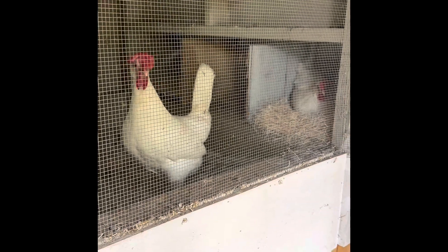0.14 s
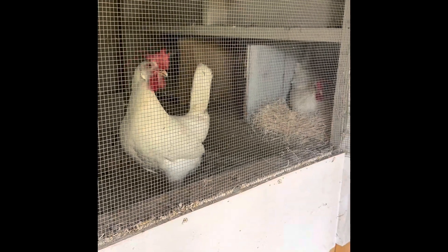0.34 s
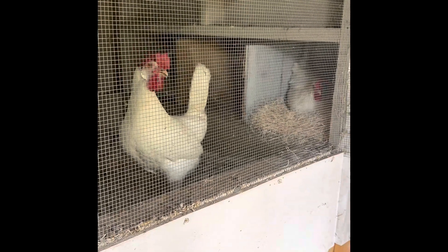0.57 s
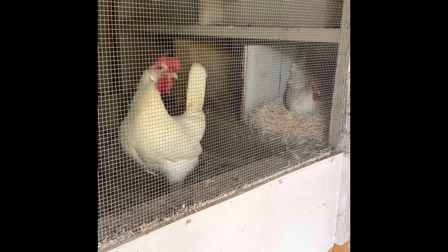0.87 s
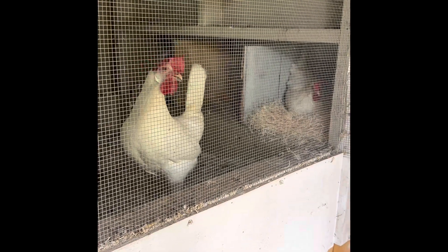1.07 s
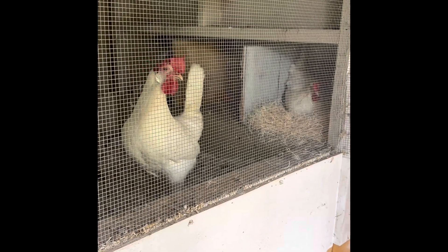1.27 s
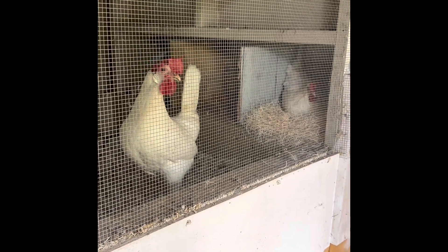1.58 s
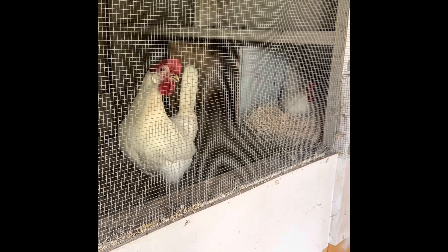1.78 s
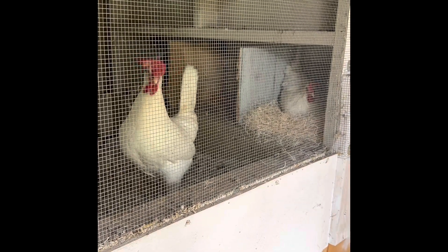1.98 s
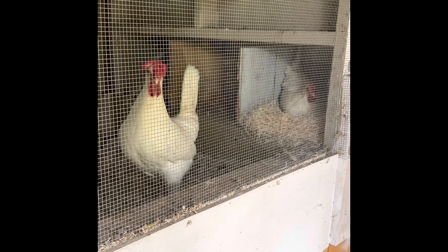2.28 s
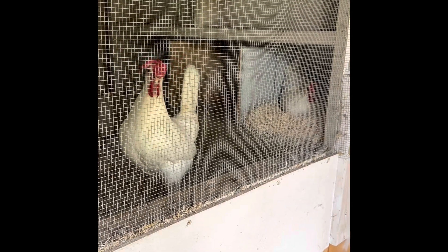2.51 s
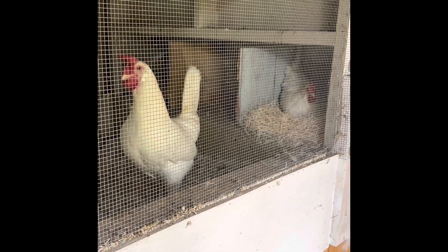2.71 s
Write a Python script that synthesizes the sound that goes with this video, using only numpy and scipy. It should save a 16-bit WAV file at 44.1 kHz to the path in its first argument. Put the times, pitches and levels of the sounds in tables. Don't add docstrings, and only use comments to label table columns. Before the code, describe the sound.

Quick steady hen clucks, close and slightly hoarse, with faint foot scuffs and soft outdoor hiss.

```python
import sys
import numpy as np
from scipy import signal
from scipy.fft import rfft, irfft, next_fast_len
from scipy.io import wavfile
from scipy.ndimage import map_coordinates

SR = 44100
rng = np.random.default_rng(int(sys.argv[2]) if len(sys.argv) > 2 else 0)


def master_out(mix):
    frames = np.transpose(np.atleast_2d(mix))
    ceiling = np.clip(frames, -1, 1)
    pcm = np.round(ceiling * 32767).astype(np.int16)
    wavfile.write(sys.argv[1], SR, pcm)


def invert_db(level):
    return 10 ** (np.asarray(level, dtype=float) / 20)


N = 125685


def unit(x):
    return x / np.sqrt(np.mean(x ** 2) + 1e-20)


def along(points, hz):
    f, v = np.transpose(points)
    return np.interp(np.log(hz + 1), np.log(f + 1), v)


def wobble(rate):
    knots = rng.standard_normal(int(N * rate / SR) + 4)
    return map_coordinates(knots, [np.arange(N) * rate / SR])


def filtered(x, response):
    m = 2 * next_fast_len(x.shape[-1] // 2 + 8192)
    spectrum = rfft(x, m) * response(np.fft.rfftfreq(m, 1 / SR))
    return irfft(spectrum, m)[..., :x.shape[-1]]


def causal(points):
    def response(hz):
        c = irfft(np.log(invert_db(along(points, hz))))
        c[1:len(c) // 2] *= 2
        c[len(c) // 2 + 1:] = 0
        return np.exp(rfft(c))
    return response


def rise(t, tau):
    return 1 - np.exp(-(np.maximum(t, 0) / max(tau, 1e-4)) ** 2)


def resonance(f, hz, width, db):
    return invert_db(db) * 1j * f * width / (hz * hz - f * f + 1j * f * width)


def stereo_noise(points):
    mono_hz = 330

    def mid_side(hz):
        spread = hz ** 2 / (hz ** 2 + mono_hz ** 2) + 0.049
        return invert_db(along(points, hz)) * np.array([np.ones_like(hz), spread])
    mid, side = filtered(rng.standard_normal((2, N)), mid_side)
    return unit(np.array([mid + side, mid - side]))


# frequency in Hz, level in dB per Hz.
RUMBLE = [(12, -47), (20, -13.5), (43, -5), (59, 6), (183, -9), (200, -5.5), (260, -16), (440, -120)]
# time in seconds, level in dB.
RUMBLE_SWELL = [(0.0, -59.5), (0.59, -71), (0.64, -60), (0.72, -76.5), (1.44, -74), (1.63, -62),
                (2.69, -66.5), (2.78, -68), (2.85, -51.5)]


def rumble():
    s, db = np.transpose(RUMBLE_SWELL)
    level_db = np.interp(np.arange(N) / SR, s, db) + 0.81 * wobble(8)
    return invert_db(level_db) * stereo_noise(RUMBLE)


# frequency in Hz, level in dB per Hz.
AIR = [(200, -16), (700, -12.5), (1200, -5), (1600, -25), (3200, -29), (5000, -37.5), (8000, -36.5),
       (12000, -95)]
AIR_DB, GUST_DB = -57.5, -0.5


def air():
    return invert_db(AIR_DB + GUST_DB * wobble(3.4)) * stereo_noise(AIR)


# frequency in Hz, level in dB.
APART = [(300, -7), (3000, -10.5), (8000, -5), (11000, -20.5)]


def tail(decays, delay_s, size):
    hz, t, z = signal.stft(rng.standard_normal((2, size)), SR, nperseg=256)
    decay = invert_db(-60 * t / along(decays, hz)[:, None])
    h = signal.istft(z * decay, SR, nperseg=256)[1]
    h = h * rise(np.arange(h.shape[1]) / SR - delay_s, 0.006)
    h = h / np.linalg.norm(h, axis=1, keepdims=True)
    opposed = filtered(h[1], lambda f: invert_db(along(APART, f)))
    return h[0] + np.array([opposed, -opposed])


# frequency in Hz, time to fall 60 dB in seconds.
YARD = [(300, 0.41), (1200, 0.63), (1700, 0.13), (3300, 0.61), (7000, 0.55)]
# frequency in Hz, time to fall 60 dB in seconds.
FAR_WALL = [(300, 0.2), (1200, 0.4), (3500, 0.12), (7000, 0.07)]
YARD_DB, FAR_WALL_S, FAR_WALL_DB = -31, .19, -43.5


def yard(x):
    h = invert_db(YARD_DB) * tail(YARD, 0.049, size=SR * 3 // 4)
    echo = invert_db(FAR_WALL_DB) * tail(FAR_WALL, 0, size=SR // 4)[:, :SR // 4]
    start = round(FAR_WALL_S * SR)
    h[:, start:start + SR // 4] += echo
    return signal.fftconvolve(x[None], h, axes=1)[:, :N]


# frequency in Hz, time to fall 60 dB in seconds.
COOP = [(200, 0.19), (530, 0.19), (1300, 0.18), (3700, 0.16), (9700, 0.21), (15000, 0.15)]
# delay in seconds, level in dB.
WALLS = [(.0021, -10.5), (.0034, -10.5), (.0052, -14.5), (.0077, -2), (.011, -13)]
COOP_DB, WALL_SHIFT = -3.5, .12


def coop(x):
    out = np.zeros((2, N))
    delays, walls_db = np.transpose(WALLS)
    edges = [0] + [round((row[0] - .02) * SR) for row in CLUCKS[1:]] + [N]
    for a, b in zip(edges, edges[1:]):
        h = invert_db(COOP_DB) * tail(COOP, 0.0037, size=SR // 4)
        moved = delays * (1 + WALL_SHIFT * rng.uniform(-1, 1, len(delays)))
        h[:, (SR * moved).astype(int)] += invert_db(walls_db)
        wet = signal.fftconvolve(x[None, a:b], h, axes=1)[:, :N - a]
        out[:, a:a + wet.shape[1]] += wet
    return out


# start in seconds, level in dB, rise in seconds, time to fall 60 dB in seconds.
SCUFFS = [
    (0.288, -68, 0.0055, 0.078),
    (0.999, -54.5, 0.091, 0.24),
    (1.3, -80, 0.0033, 0.11),
    (1.714, -46.5, 0.00074, .07),
    (1.895, -46.5, .0012, 0.16),
    (2.149, -61.5, .02, 0.067),
]
# frequency in Hz, level in dB per Hz.
LITTER = [(300, -13), (600, -6.5), (1250, -8.5), (3000, -12), (6000, -14), (9000, -17.5), (13000, -14),
          (16000, -23)]


def scuffs():
    t, level = np.arange(N) / SR, np.zeros(N)
    grit = rng.standard_normal(N) * invert_db(1.5 * wobble(400))
    for s, db, attack, t60 in SCUFFS:
        fall_db = 60 * np.maximum(t - s - attack, 0) / t60
        level += invert_db(db - fall_db) * rise(t - s, attack)
    return level * unit(filtered(grit, lambda hz: invert_db(along(LITTER, hz))))


OPEN_S, GLIDE_S, CREEP_PER_S, DOUBLING_S = 0.00318, .008, 4.45, 0.0086
JITTER, SHIMMER_DB, CALM = .035, 1.6, .35


def syrinx(t, lead, top_hz, first_hz, doubling, attack):
    low = np.minimum(first_hz * (1 + CREEP_PER_S * (1 + attack / 0.0043) * t), top_hz)
    pitch = low + (top_hz - low) * rise(t - lead + OPEN_S, GLIDE_S)
    cycles = np.cumsum(pitch) / SR
    k = np.arange(int(cycles[-1]) - 1)
    strain = np.clip(doubling, 0, .9) * rise(t - lead, DOUBLING_S)
    strain_k = np.interp(k, cycles, strain)
    split = strain_k * (-1.) ** k
    rough = CALM + 2 * strain_k
    a, b = rng.standard_normal((2, len(k)))
    at = np.interp(k + 0.11 + .15 * split + JITTER * rough * a, cycles, np.arange(len(t)))
    size = (1 + split) * invert_db(SHIMMER_DB * rough * b)
    pulses = (size[:, None] * np.sinc(np.arange(len(t)) - at[:, None])).sum(0)
    return pitch, cycles, pulses


# start in seconds, soft lead-in in seconds, length in seconds, level in dB,
# top pitch in Hz.
CLUCKS = [(0.06, 0.016, 0.032, -15.5, 621.5), (0.305, 0.0087, 0.0408, -15, 629),
          (0.553, 0.01, 0.043, -17, 649), (0.804, 0.011, 0.036, -15, 637.6), (1.07, 0.011, 0.04, -17, 636),
          (1.306, 0.019, 0.0432, -18.5, 661.4), (1.536, .021, 0.0378, -16.5, 629),
          (1.748, .024, 0.042, -30, 410), (1.978, 0.026, 0.051, -18, 640.8),
          (2.192, .020, 0.051, -17, 651.2), (2.484, 0.008, 0.04, -12, 654),
          (2.732, 0.0088, 0.045, -13.5, 655.4)]
# first pitch in Hz, period doubling from 0 to 1,
# lead-in level relative to full voice in dB, attack in seconds.
VOICING = [(420.7, 0.52, -7, 0.0011), (512, 0.42, 3, 0.009), (437.3, 0.51, -7, 0.0044),
           (458.6, 0.48, -17, 0.0017), (464, 0.44, -7.5, 0.0026), (410, .3, -10.5, .002),
           (420.5, .35, -11, 0.0018), (287.5, 0.02, -9.5, 0.0048), (311.7, 0.22, -13, 0.0055),
           (354, 0.51, -9.5, 0.011), (488, 0.69, 1, 0.017), (425.7, 0.57, -1.5, 0.01253)]
# frequency in Hz, width in Hz, level in dB.
BEAK = [
    (802, 153, -2.5),
    (991, 129, -5),
    (1197.4, 178, -5),
]
# frequency in Hz, width in Hz, level in dB.
THROAT = [(2128, 368, -9.5), (2975, 130, -13), (3426, 164, -13.5), (4313, 408, -21.5), (6330, 260, -18.5),
          (7886, 474, -25), (9580, 600, -25), (15400, 800, -73)]
# frequency in Hz, level in dB.
TILT = [(150, 7.5), (400, 12), (1380, 8.5), (1600, -7.5), (2500, 4), (9800, -3), (11500, 10), (15000, 14)]
VOICE_DB, FLUTTER_DB, RELEASE_S, SAG_DB_PER_S = 13.5, 1.5, 0.002, 62.5
RASP, RASP_HZ, RASP_GATED = .55, 1667, 0.22
SHUT_DULL_DB, DULLING_DB_PER_S = -5.5, 272.5


def hen():
    t = np.arange(SR // 12) / SR
    source = np.zeros((2, N + SR))
    opening, bright = np.zeros((2, N + SR))
    positions = np.arange(len(BEAK))
    for (s, lead, length, db, top_hz), (first_hz, doubling, lead_db, attack) in zip(CLUCKS, VOICING):
        pitch, cycles, pulses = syrinx(t, lead, top_hz, first_hz, doubling, attack)
        gate = 1 + RASP_GATED * np.cos(2 * np.pi * (cycles - .1))
        rasp = gate * rng.standard_normal(len(t))
        shut = 1 - rise(t - lead + OPEN_S, OPEN_S)
        held = np.maximum(t - lead, 0)
        effort = np.sqrt(rise(t, attack)) * invert_db(lead_db * shut - SAG_DB_PER_S * held)
        effort = effort * (1 - rise(t - length + RELEASE_S, RELEASE_S))
        i = round(s * SR)
        span = slice(i, i + len(t))
        source[:, span] = invert_db(db) * effort * [unit(pulses), RASP * unit(rasp)]
        bright[span] = invert_db(SHUT_DULL_DB * shut - DULLING_DB_PER_S * held)
        opening[span] = np.interp(2 * pitch, [row[0] for row in BEAK], positions)
    voiced, rasp = source[:, :N]
    breath = voiced + filtered(rasp, lambda f: 1j * f / (RASP_HZ + 1j * f))
    breath = breath * invert_db(FLUTTER_DB * wobble(150))

    def beak(f):
        return np.array([resonance(f, *row) for row in BEAK])

    def throat(f):
        return sum((-1) ** (k + 1) * resonance(f, *row) for k, row in enumerate(THROAT))
    shares = np.maximum(1 - np.abs(opening[:N] - positions[:, None]), 0)
    mouth = filtered(breath * shares, beak).sum(0)
    upper = filtered(breath * bright[:N], throat)
    return invert_db(VOICE_DB) * filtered(mouth + upper, causal(TILT))


# frequency in Hz, level difference in dB.
LOUDER_LEFT = [(60, -10.5), (150, -6.5), (380, 4), (950, 5), (2380, -1), (5980, -0.5), (15000, 1)]
# frequency in Hz, phase lead in radians.
LEFT_LEADS = [(0, -4), (860, 0.54), (1200, 0.43), (2400, 0.33), (5700, 2.14), (10200, -3), (14000, -3),
              (15800, -5.5)]


def microphones(x):
    half = np.array([[.5], [-.5]])

    def ports(hz):
        return invert_db(half * along(LOUDER_LEFT, hz)) * np.exp(1j * half * along(LEFT_LEADS, hz))
    return filtered(x, ports)


def scene():
    near = hen() + scuffs()
    return microphones(near + yard(near) + coop(near)) + air() + rumble()


def top_cut(x):
    return signal.sosfilt(signal.butter(12, 16500, fs=SR, output="sos"), x)


def record(dry):
    mix = filtered(dry, lambda hz: np.clip((15950 - hz) / 150, 0, 1))
    return top_cut(mix)


dry = scene()
out = record(dry)
master_out(out)
```